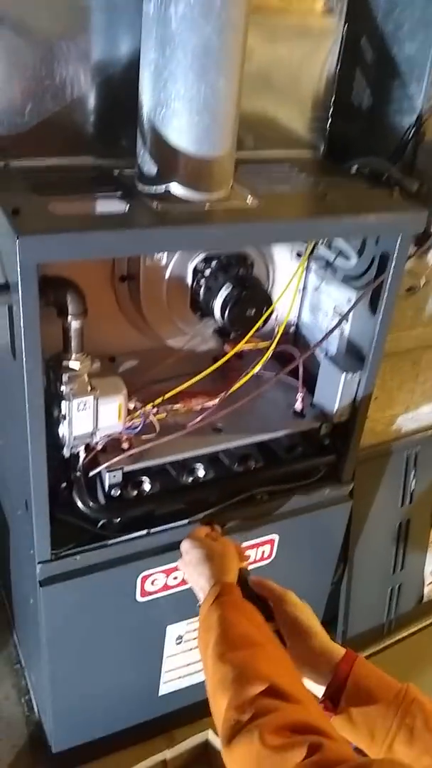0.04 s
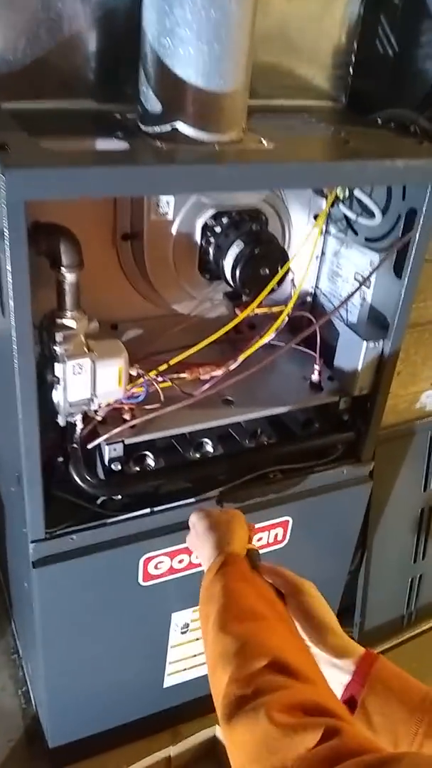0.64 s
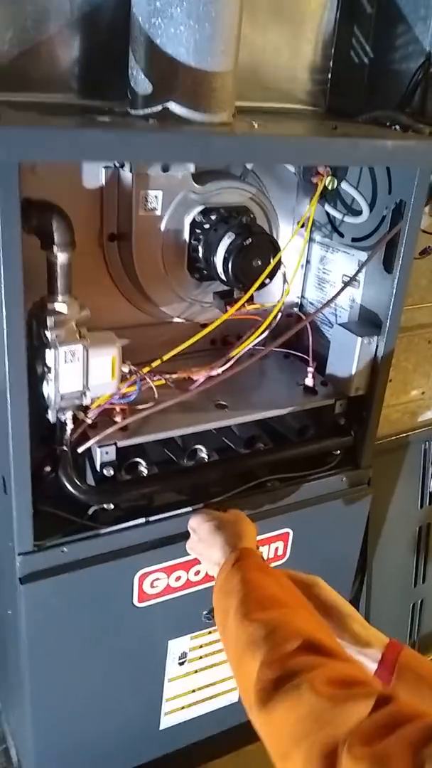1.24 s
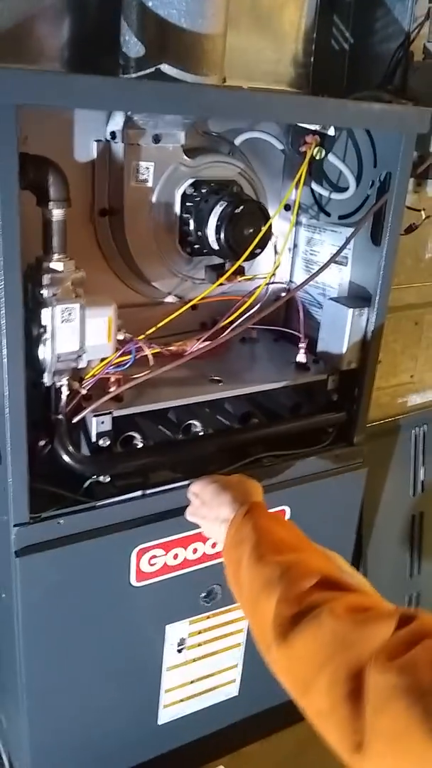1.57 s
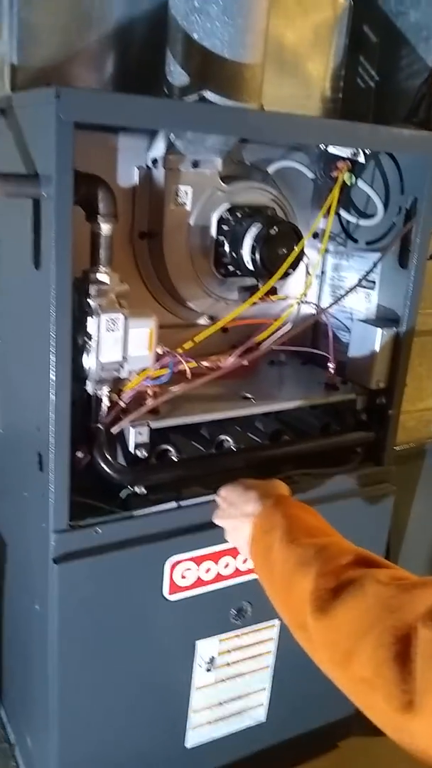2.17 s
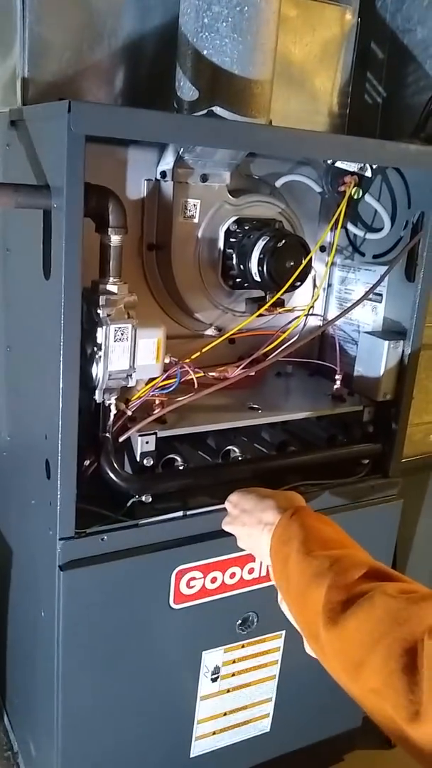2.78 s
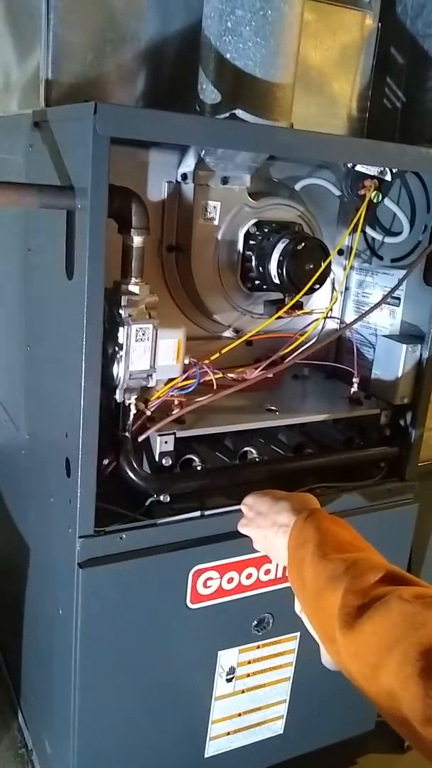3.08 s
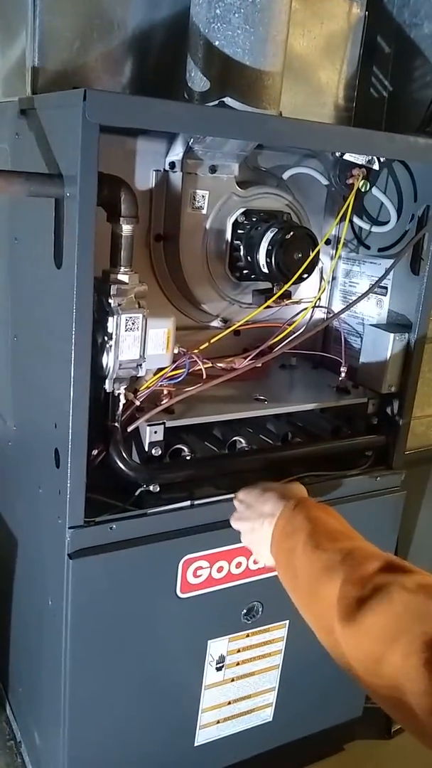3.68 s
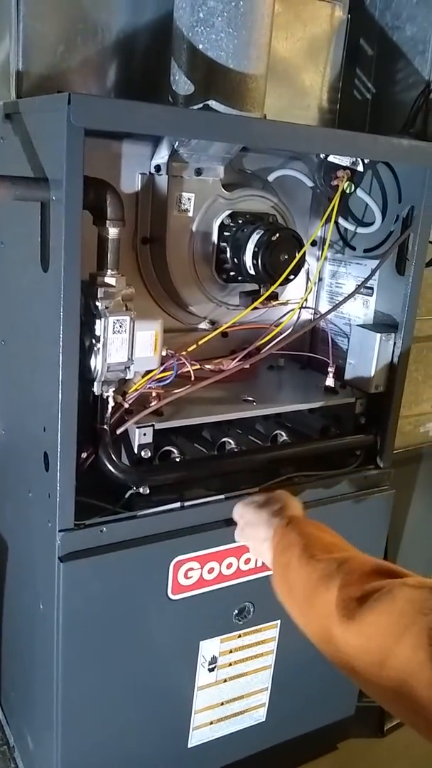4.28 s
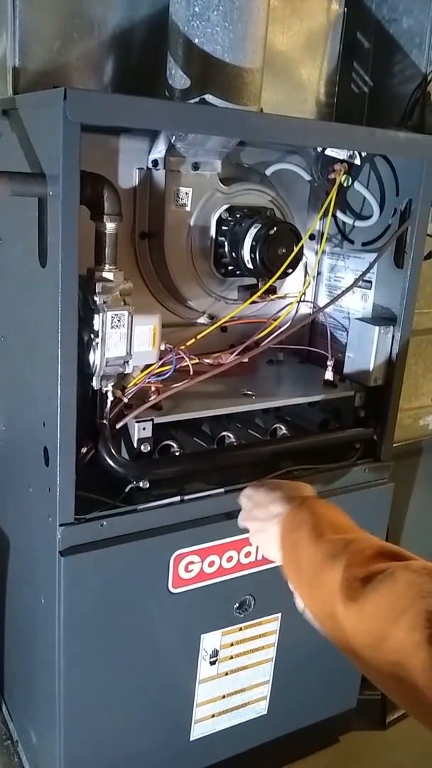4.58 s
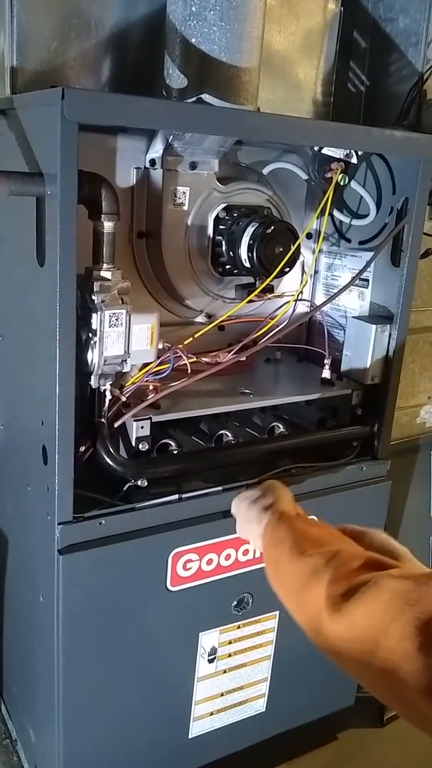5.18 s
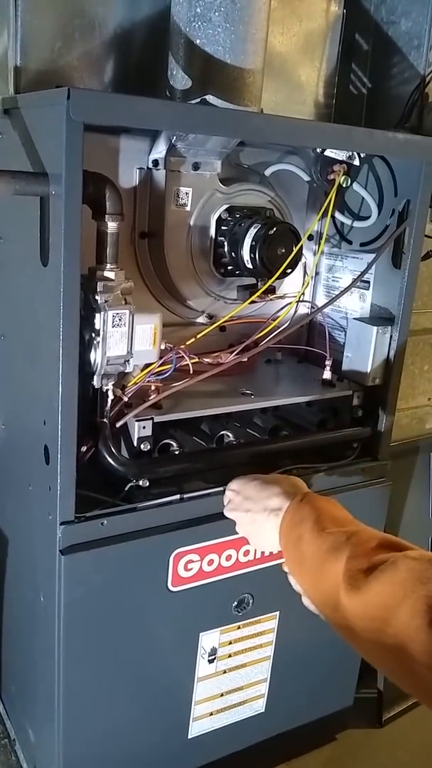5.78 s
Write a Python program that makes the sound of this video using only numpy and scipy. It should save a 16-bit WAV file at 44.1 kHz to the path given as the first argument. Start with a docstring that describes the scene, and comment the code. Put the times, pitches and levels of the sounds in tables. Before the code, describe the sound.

Hands work a sheet-metal furnace door into place with irregular hollow knocks, light ticks and soft sleeve rustles in a small room.

```python
"""A furnace's lower sheet-metal door, worked into its seat by hand in a small utility room.
It knocks and catches on the cabinet: the panel booms and rings, bare edges tick, and the sheet
thuds as it flexes under the hand. A sleeve brushes along between knocks, over a faint room rumble.
Heard close by, through a phone that widens the stereo image."""
import sys
import numpy as np
from scipy import signal
from scipy.fft import rfft, irfft, next_fast_len
from scipy.io import wavfile

SR = 44100
rng = np.random.default_rng(int(sys.argv[2]) if len(sys.argv) > 2 else 0)


def master_out(mix):
    """Clip the mix to full scale and print it as 16-bit PCM to the path in sys.argv[1]."""
    frames = np.transpose(np.atleast_2d(mix))
    ceiling = np.clip(frames, -1, 1)
    pcm = np.round(ceiling * 32767).astype(np.int16)
    wavfile.write(sys.argv[1], SR, pcm)


N = 265878


def from_db(db):
    """Decibels to gain."""
    return 10 ** (np.asarray(db) / 20)


def unit_rms(x):
    """Scale to rms 1."""
    return x / np.sqrt(np.mean(x ** 2) + 1e-20)


def butter(x, order, hz, kind):
    """Causal Butterworth filter."""
    return signal.sosfilt(signal.butter(order, hz, kind, fs=SR, output="sos"), x)


def at_hz(rows, hz):
    """A table's value columns, interpolated over log frequency."""
    freqs, *columns = np.transpose(rows)
    return [np.interp(np.log(hz), np.log(freqs), column) for column in columns]


def clicks(times_s, heights):
    """One impulse at each time."""
    out = np.zeros(N)
    np.add.at(out, np.clip(np.round(times_s * SR).astype(int), 0, N - 1), heights)
    return out


def fade(x, t60_s):
    """Each impulse jumps up, then decays exponentially."""
    pole = from_db(-60 / (t60_s * SR))
    return signal.lfilter([1], [1, -pole], x + 1e-18)


def ring(x, hz, t60_s):
    """One mode: a unit impulse starts a decaying sine of height 1."""
    radius, angle = from_db(-60 / (t60_s * SR)), 2 * np.pi * hz / SR
    return signal.lfilter([0, np.sin(angle)], [1, -2 * radius * np.cos(angle), radius ** 2], x + 1e-18)


def soften(x, lag_s):
    """One-pole lag."""
    pole = np.exp(-1 / (lag_s * SR))
    return signal.lfilter([1 - pole], [1, -pole], x)


def noise_bands():
    """Half-octave bands of two independent noises: (centre [Hz], noise pair)."""
    edges_hz = 30 * 2 ** np.arange(0, 9.6, .5)
    white = rng.standard_normal((2, 2, N))
    for k, (low, high) in enumerate(zip(edges_hz, edges_hz[1:])):
        band = butter(white[k % 2], 2, [low, min(high, SR / 2.1)], "band")
        yield np.sqrt(low * high), unit_rms(band)


def coloured(spectrum):
    """Two independent noises with the given spectrum, rms 1."""
    size = next_fast_len(N)
    gain = from_db(at_hz(spectrum, np.fft.rfftfreq(size, 1 / SR) + 1)[0])
    white = rng.standard_normal((2, size))
    return unit_rms(irfft(rfft(white) * gain, size)[:, :N])


def contacts(rebound_s=.02, loss_db=9, dulling_db=12):
    """The door hits the cabinet and falls back once per knock, weaker and duller."""
    # knocks: (time [s], strength [dB], hardness [dB], depth [dB])
    knocks = [(0.005, -50, -7, 7.5), (0.256, -50.5, -14, 3), (0.54, -49.5, 0, -1), (0.588, -20, 1.5, -3),
              (1.019, -40, -8, -7), (1.067, -38, 1, -8), (1.084, -23, 2, 3.5), (1.126, -41.5, 19, -13),
              (1.163, -46, -16, 4), (1.267, -38, -3, 7), (1.441, -31.5, -2.5, -5), (1.473, -37.5, 7, 2),
              (1.51, -35.5, -4.5, -2), (1.578, -29.5, -13, -4), (1.612, -44, -23, 12.5),
              (1.841, -39, -1.5, -1.5), (2.028, -43.5, 8, 6.5), (2.046, -41.5, 9.5, 8),
              (2.066, -34, 10, -5), (2.08, -32, 10, -4.5), (2.415, -46.5, -4, 0), (2.441, -31, -1, -4.5),
              (2.675, -48, -22, 0.5), (3.394, -47.5, -1, -1), (4.049, -54.5, 15, -8),
              (4.069, -49, -19, 6.5), (4.254, -50, -28, 0.5), (4.757, -34, -17, -4),
              (4.895, -30.5, -5.5, -2), (4.904, -38, 2, 3), (5.034, -42.5, 9.5, -2), (5.062, -51, 14, 4.5),
              (5.276, -47, -9, 8), (5.377, -39.5, 11.5, 1), (5.392, -23, 6.5, -1.5), (5.518, -38, 3, -6),
              (5.626, -45, -18, 5.5), (5.834, -41.5, -4.5, 2)]
    rebound = np.array([rebound_s, -loss_db, -dulling_db, 0])
    return np.array([row for knock in np.array(knocks) for row in (knock, knock + rebound)])


def blow_db(hz, boom_full_hz=277, boom_top_hz=350, hard_full_hz=3520):
    """Each contact's level at hz: a mid-sheet blow adds boom (depth), a bare edge treble (hardness)."""
    # spectrum of an ordinary blow: (frequency [Hz], level [dB])
    blow = [(270, -3), (350, -2.5), (500, -1), (750, -3.5), (1600, -3.5), (3800, -8)]
    _, strength_db, hardness_db, depth_db = contacts().T
    bass = at_hz([(boom_full_hz, 1), (boom_top_hz, 0)], hz)[0]
    treble = min(hz / hard_full_hz, 1) ** 1.4
    return strength_db + at_hz(blow, hz)[0] + bass * depth_db + treble * hardness_db


def struck(modes, scatter_db, travel_s):
    """Each contact lands on another spot, so it drives every mode with a strength of its own."""
    times_s, out = contacts()[:, 0], np.zeros((2, N))
    shape = (len(times_s), len(modes))
    spot_db = scatter_db * rng.standard_normal(shape)
    delay_s = rng.uniform(0, travel_s, shape)  # bending waves cross the sheet
    for k, (hz, mode_db, t60_s) in enumerate(modes):
        heights = from_db(blow_db(hz) + mode_db + spot_db[:, k]) * (-1) ** k
        drive = clicks(times_s + delay_s[:, k], heights)
        side = rng.random() ** 3 - .1  # own direction per mode, mostly left
        out += ring(drive, hz, t60_s) * np.array([[1 - side], [side]])
    return out


def door(sheet_db=-4, lip_db=-7):
    """The broad sheet clangs; its stiff folded lip tinkles briefly."""
    # sheet modes: (frequency [Hz], level [dB], t60 [s])
    sheet_modes = [(181, -10.5, 0.22), (204, -7, 0.23), (227, -8, 0.61), (240.5, -2, 0.24),
                   (254.3, -6, 0.52), (291.9, -6, 0.29), (300, -5, 0.32), (338.3, -5, 0.25),
                   (361.5, -1.5, 0.26), (377, -16.5, 0.15), (416, -7.5, 0.29), (447, -6.5, 0.34),
                   (463.3, -2, 0.14), (518, -14.5, 0.51), (540, -8, 0.17), (585, -11, 0.43),
                   (624, -10, 0.29), (698.4, -16, 0.66), (766, -19.5, 0.4), (888.5, -7.5, 0.15),
                   (943, -6.5, 0.081), (1055.6, -10, 0.22), (1093, -20.5, 0.29), (1194, -12.5, 0.27),
                   (1270, -11, 0.19), (1375, -13.5, .2), (1490, -13, 0.18), (1537, -14, 0.25),
                   (1690, -39, 0.15), (2012, -8, 0.18)]
    # lip modes: (frequency [Hz], level [dB], t60 [s])
    lip_modes = [(1923, -10, 0.087), (2075, -3, 0.065), (2420, -2, 0.14), (2544, -2.5, 0.12),
                 (3487, -10.5, 0.067), (3810, -9, 0.063), (5160, -15, 0.054), (5740, -5.5, 0.047),
                 (6100, -24, 0.046), (9060, -1, 0.031)]
    sheet = struck(sheet_modes, scatter_db=1.7, travel_s=.004044)
    lip = struck(lip_modes, scatter_db=5, travel_s=.002014)
    return from_db(sheet_db) * sheet + from_db(lip_db) * lip


def cabinet(gain_db=-2, right_db=-5, build_cycles=.13, seat_s=.00085, room_build_s=.018):
    """Dense cabinet modes die quickly, mostly on the left; the room answers from both sides."""
    # fine modes as half-octave noise bands: (frequency [Hz], level [dB], t60 [s])
    fine_modes = [(60, -33, 0.24), (117, -16.5, 0.15), (242, -9.5, 0.14), (460, -7, 0.13),
                  (880, -8.5, 0.24), (1620, -15, 0.25), (2370, -11.5, 0.17), (3230, -15, 0.15),
                  (5600, -12.5, 0.13), (9600, -13, 0.16), (14200, -14, 0.072)]
    # room reverberation: (frequency [Hz], relative level [dB], t60 [s])
    reverb = [(102, -24, 2), (276, -8.5, 1.59), (746, -21, 1.27), (1500, -8.5, 0.38), (3900, -7, 0.14),
              (12000, -35, 0.13)]
    times_s, out = contacts()[:, 0], np.zeros((2, N))
    for hz, noise in noise_bands():
        band_db, t60_s = at_hz(fine_modes, hz)
        room_db, room_t60_s = at_hz(reverb, hz)
        hits = clicks(times_s, from_db(blow_db(hz) + band_db) ** 2)
        energy = soften(hits, seat_s)  # the edge seats gradually
        near = soften(fade(energy, t60_s / 2), build_cycles / hz)  # low modes build more slowly
        room = soften(fade(energy, room_t60_s / 2), room_build_s) * from_db(room_db) ** 2
        out += noise * np.sqrt(near * from_db([[0], [right_db]]) ** 2 + room / 2)
    return from_db(gain_db) * out


def edge_ticks(gain_db=4.5, t60_s=.0054, band_hz=(6500, 12000), build_s=.0029, firm_db=-30):
    """Bare edges catch on each other with a brief bright crack."""
    times_s, tick_db = contacts()[:, 0], blow_db(band_hz[0])
    crack_db = tick_db + .74 * np.maximum(tick_db - firm_db, 0)  # harder contacts: shorter, so brighter
    envelope = soften(fade(clicks(times_s, from_db(crack_db)), t60_s), build_s)
    noise = unit_rms(butter(rng.standard_normal(N), 2, band_hz, "band"))
    return from_db(gain_db) * noise * envelope


def room_air(gain_db=-54.5):
    """The room's air: a faint steady rumble from all round."""
    # air spectrum: (frequency [Hz], density [dB])
    spectrum = [(25, 8), (55, -7), (85, -5), (130, 6.5), (185, -7.5), (240, -5), (420, -8.5), (600, -12),
                (1100, -18), (2000, -20), (4000, -20.5), (7500, -23), (10500, -21.5), (14000, -28.5)]
    return from_db(gain_db) * diffuse(spectrum)


def rubbing(rustle_db=-66.5, ease_s=.045):
    """Sleeve envelope: bell-shaped strokes over a faint rustle while the arm moves."""
    # sleeve strokes: (centre [s], peak [dB], half-power width [s])
    strokes = [(0.162, -59, 0.078), (0.225, -52, 0.03), (.39, -60.5, 0.18), (0.69, -54.5, 0.045),
               (1.013, -59, 0.15), (1.86, -61, 0.055), (4.167, -54.5, 0.081), (4.324, -63, 0.041),
               (4.476, -61.5, 0.047), (4.602, -57.5, 0.089), (4.75, -62, 0.033), (5.266, -59, 0.055),
               (5.851, -60, 0.11)]
    # arm movements: (start [s], end [s])
    arm_moves = [(0, 2.38), (4.05, 5.45)]
    t = np.arange(N) / SR
    stroke_power = sum(from_db(peak_db) ** 2 * .5 ** ((2 * (t - centre_s) / width_s) ** 2)
                       for centre_s, peak_db, width_s in strokes)
    moving = soften(sum((t > start_s) & (t < end_s) for start_s, end_s in arm_moves), ease_s)
    return np.sqrt(stroke_power + from_db(rustle_db) ** 2 * moving)


def sleeve(grain_db=1, grain_s=.0086, zip_db=-3, zip_hz=(9400, 11200)):
    """Threads slip over each other in small clumps; the briskest strokes make the weave zip."""
    # cloth rubbing on cloth: (frequency [Hz], density [dB])
    spectrum = [(500, 0.5), (1500, -2.5), (3000, -1), (4500, 2.5), (6000, 4), (7600, 2), (9600, 2.5),
                (10200, 8.5), (10900, -4), (12500, 0), (14500, -5)]
    clumps_db = grain_db * unit_rms(soften(rng.standard_normal(N), grain_s))
    rub = rubbing()
    weave = unit_rms(butter(rng.standard_normal((2, N)), 2, zip_hz, "band"))
    cloth = diffuse(spectrum) + from_db(zip_db) * weave * rub / rub.max()
    return cloth * rub * from_db(clumps_db)


def flex():
    """The sheet gives way under the hand and thuds in its lowest modes."""
    # thuds: (time [s], level [dB])
    thuds = [(0.591, -40), (1.092, -48), (3.398, -50), (5.395, -35), (5.519, -40.5), (5.583, -48),
             (5.625, -49), (5.761, -45), (6.001, -50)]
    # slow bending modes: (frequency [Hz], level [dB], t60 [s])
    bending_modes = [(93.9, -5.5, 0.77), (125.4, -6.5, 0.64), (142.3, 2, 0.28)]
    times_s, thud_db = np.transpose(thuds)
    push = clicks(times_s, from_db(thud_db))
    return sum(from_db(mode_db) * ring(push, hz, t60_s) for hz, mode_db, t60_s in bending_modes)


def stereo_widening(sides):
    """The phone's stereo widening shifts phase between left and right channels, varying with frequency."""
    # widening's shift between channels: (frequency [Hz], phase [rad])
    widening_phase = [(0, 0), (90, -.6), (400, -1.0), (750, -.6), (1050, 0), (1350, .15), (2150, 2.9),
                      (2450, 3.4), (3250, 6.1), (3550, 6.45), (4500, 9.42), (14600, 37.7)]
    size = next_fast_len(N + SR // 10)
    phase_rad = np.interp(np.fft.rfftfreq(size, 1 / SR), *np.transpose(widening_phase))
    shift = np.exp(.5j * phase_rad)
    left, right = rfft(sides, size)
    return irfft(np.array([left * shift + right / shift, left / shift + right * shift]), size)[:, :N]


def diffuse(spectrum, split_hz=5500):
    """Noise from all round: both channels share its lows; the highs differ in each."""
    shared = butter(stereo_widening(coloured(spectrum)) / np.sqrt(2), 3, split_hz, "low")
    return shared + butter(coloured(spectrum), 3, split_hz, "high")


def glances(sound, share=.61, above_hz=5000, t60_s=.0094):
    """Short waves glance off hand and metal, differently for each channel."""
    size = next_fast_len(N + SR // 10)
    t = np.arange(SR // 100) / SR
    paths = rng.standard_normal((2, len(t))) * from_db(-60 * t / t60_s)
    paths /= np.linalg.norm(paths, axis=1, keepdims=True)
    hz = np.fft.rfftfreq(size, 1 / SR)
    scattered = share * hz ** 6 / (hz ** 6 + above_hz ** 6)
    response = np.sqrt(1 - scattered) + np.sqrt(scattered) * rfft(paths, size)
    return irfft(rfft(sound, size) * response, size)[:, :N]


def scene():
    """Knocks, room air and sleeve in stereo."""
    from_left, balance = np.array([[1], [0]]), from_db([[.3], [-.3]])
    metal = door() + cabinet() + (edge_ticks() + flex()) * from_left
    air = room_air()
    return (glances(stereo_widening(metal)) + air) * balance + sleeve()


def record(dry, low_cut_hz=69.5, high_cut_hz=14300):
    """The phone drops the deep bass and cuts the top steeply."""
    thin = butter(dry, 4, low_cut_hz, "high")
    return signal.sosfilt(signal.ellip(10, .1, 80, high_cut_hz, fs=SR, output="sos"), thin)


dry = scene()
out = record(dry)
master_out(out)
```